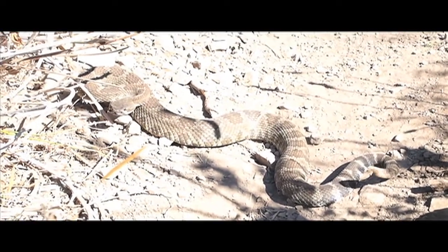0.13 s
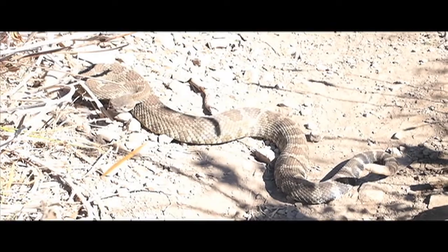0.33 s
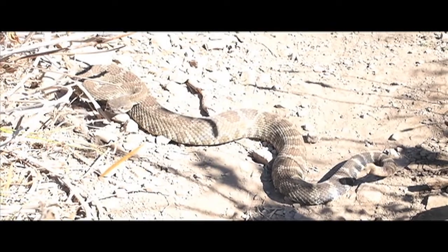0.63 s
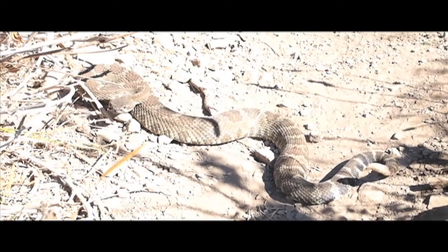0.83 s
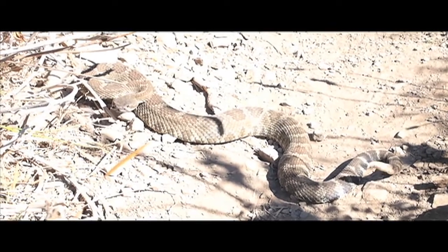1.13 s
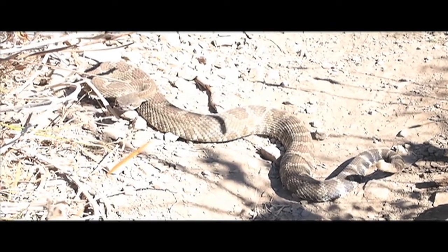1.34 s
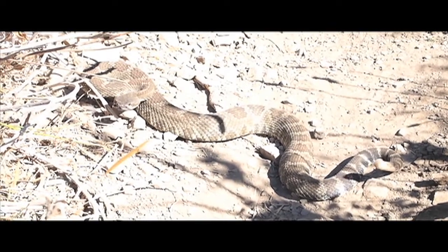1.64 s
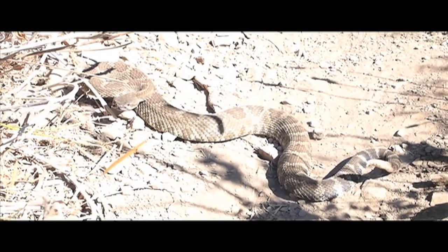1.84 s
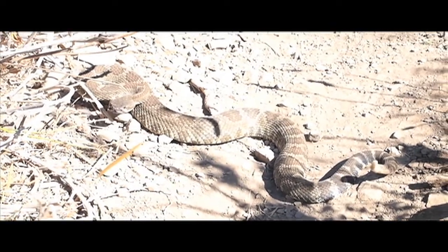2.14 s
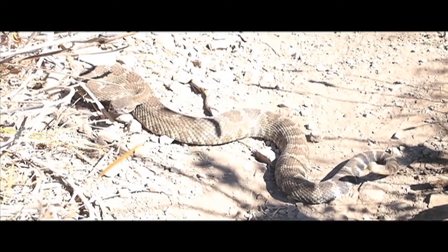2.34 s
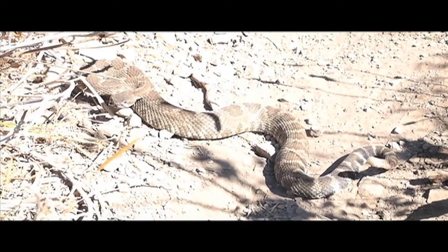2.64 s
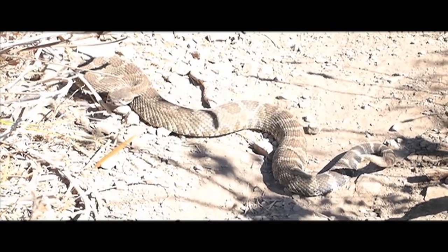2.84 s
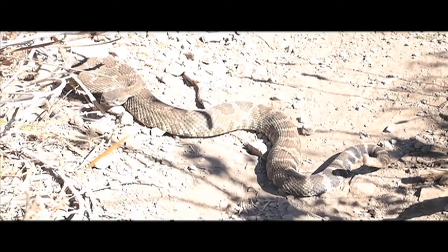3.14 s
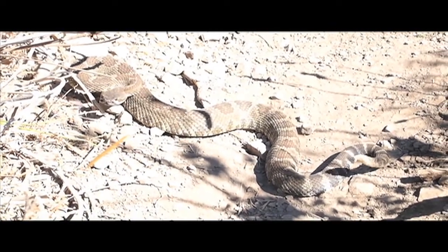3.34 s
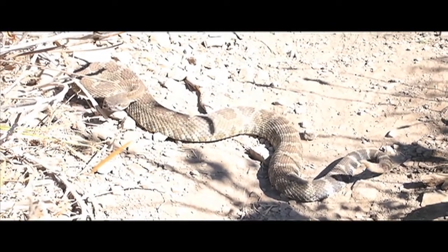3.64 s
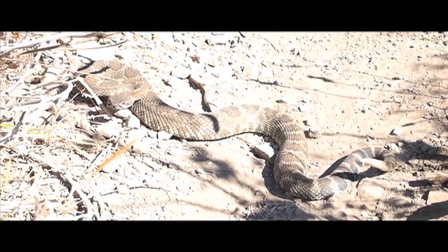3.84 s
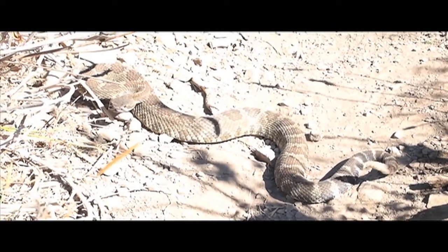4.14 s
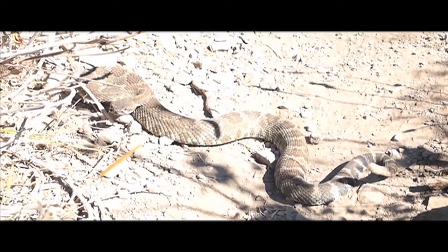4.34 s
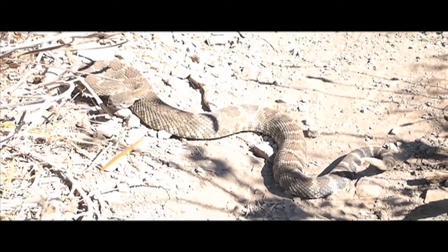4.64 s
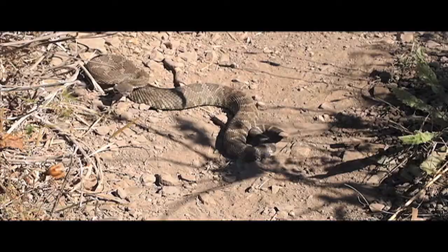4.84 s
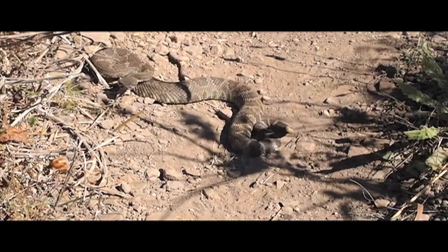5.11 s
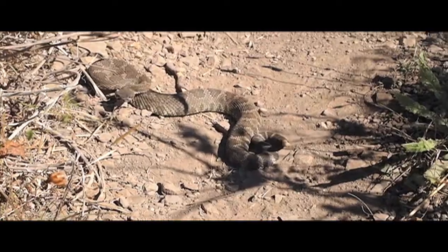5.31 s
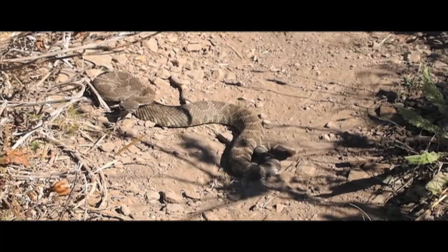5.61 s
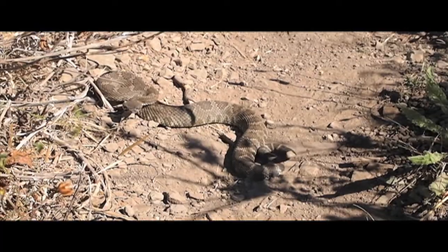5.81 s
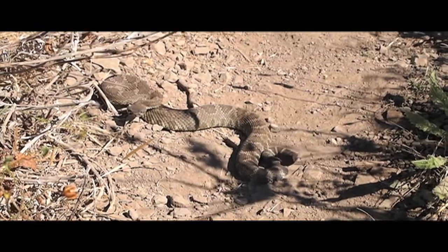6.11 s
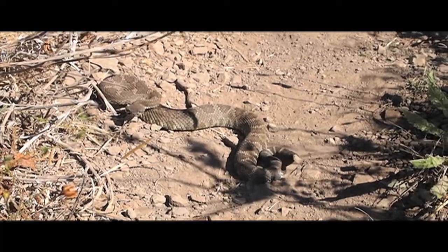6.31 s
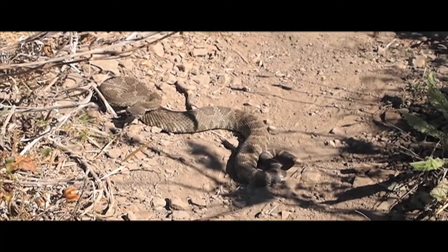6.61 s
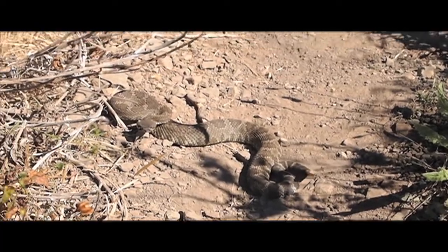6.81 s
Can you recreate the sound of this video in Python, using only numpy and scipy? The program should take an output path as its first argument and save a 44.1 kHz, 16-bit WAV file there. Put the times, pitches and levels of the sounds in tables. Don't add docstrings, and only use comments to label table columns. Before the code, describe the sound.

Close, dry outdoor perspective on stony ground with barely any echo. A bright, insect-like rattle fluttering very rapidly holds a strong level, briefly wavering around the middle. Its tone shifts slightly fuller at about five seconds, then it splits into quick separate rattle bursts with little gaps, and finally resumes as a faster continuous buzz, cut off still going. Faint wind, rustling twigs and microphone hiss stay far below.

```python
import sys
import numpy as np
from scipy import signal
from scipy.fft import rfft, irfft, next_fast_len
from scipy.io import wavfile
from scipy.ndimage import map_coordinates

SR = 44100
rng = np.random.default_rng(int(sys.argv[2]) if len(sys.argv) > 2 else 0)


def amplitude_ratio(level_db):
    exponent = np.asarray(level_db, float) / 20
    return 10 ** exponent


def unload_wav(signal):
    wavfile.write(
        sys.argv[1],
        SR,
        np.round(np.clip(np.atleast_2d(signal).T, -1, 1) * 32767).astype(np.int16),
    )


N = 306936
STEP = 16

# time_s, level_db
STEADY_SHAKING = [
    [(0, -19.5), (.15, -17.5), (1.1, -18), (2.1, -17.5), (2.95, -18.8), (3.6, -18), (4.2, -17.5),
     (4.8, -18.5), (5.38, -19)],
    [(6.36, -17), (6.55, -18), (6.96, -17.5)],
]
# time_s, full_strokes_per_s
STROKE_RATE = [(0, 43), (.5, 42.2), (.85, 43.6), (1.4, 43.4), (1.9, 41.7), (2.3, 42.7), (2.9, 42),
               (3.2, 43.8), (4.2, 43.2), (4.45, 45), (5.3, 44.8), (6.3, 46), (6.45, 54.4), (6.96, 54.6)]
# centre_s, width_ms, depth_db
FALTERS = [(.31, 19, 2.5), (.681, 12, 2.5), (1.047, 9.1, 0.5), (1.354, 26, 2.5), (1.59, 13, 2.5),
           (1.67, 10, 1.5), (1.755, 24, 2.5), (1.867, 10, 2.5), (1.938, 9, 3.5), (2.01, 11, 2.5),
           (2.083, 10, 3), (2.155, 13, 3), (2.278, 19, 5.5), (2.366, 22, 5.5), (2.465, 23, 8.5),
           (2.561, 11, 5), (2.633, 6.3, 3), (2.801, 11, 2.5), (2.87, 13, 1), (3.062, 12, 5.5),
           (3.176, 17, -2.5), (3.234, 13.3, 5), (3.343, 13, 8), (3.427, 12, 3.5), (3.501, 10, 2.5),
           (3.957, 8, 6), (4.025, 10, 1.5), (4.3, 8, 2.5), (5.043, 8, 4.5)]
# start_s, length_ms, level_db, rise_ms
FLICKS = [
    (5.451, 44, -18, 7.5),
    (5.587, 41.5, -18, 4),
    (5.756, 50.4, -19, 1.8),
    (5.945, 37.4, -17, 3),
    (6.099, 51.5, -18.5, 1.2),
    (6.25, 29.3, -16.5, 6.4),
]
# start_s, length_ms, level_db
SETTLING = [(5.388, 51, -25.5), (5.497, 42, -27.5), (5.549, 12, -42), (5.572, 15, -33), (5.635, 24, -37.5),
            (5.657, 19, -29), (5.683, 15, -48), (5.707, 8, -47), (5.749, 6.3, -23), (5.815, 28, -38),
            (5.84, 24.4, -33), (5.93, 16, -34), (5.988, 23, -33), (6.013, 11.6, -27.5), (6.028, 12, -46),
            (6.062, 9.1, -48), (6.095, 6, -35), (6.165, 59, -43), (6.192, 10, -34), (6.229, 14, -25),
            (6.289, 55, -39), (6.348, 13, -34)]
KNOCK_TURNS = [(1, 0.037, 0.19), (2, 0.47, 0.94), (4, 0.25, 0.69)]
TICK_TURNS = [(1, 0.046, 0.49), (2, 0.12, 1.87), (4, 0.36, 2.17)]
# start_s, peak_db
HARD_BLOWS = [(0.4678, -3), (0.542, -7), (0.692, -3), (.9817, -4), (1.185, -3), (1.496, -6), (2.0938, -3),
              (2.3144, -5), (2.4234, -2.5), (2.468, -2.5), (2.6928, -0.5), (2.72, -9), (3.2961, 2.5),
              (3.473, 0.5), (3.8646, -4), (4.4393, -4), (5.0625, -9), (5.227, -1), (5.4783, -4),
              (5.6063, -0.5), (5.7657, -8), (5.786, -2), (5.9589, -1), (6.107, -3), (6.148, -5),
              (6.2546, -0.5), (6.3692, -7), (6.427, -6)]
COLOUR_CHANGES = [
    4.86,
    6.33,
]
# pitch_hz, level_db (per Hz)
NEAR_COLOUR = [(1100, -42), (1850, -35.5), (2430, -20.5), (2950, -21.5), (3550, -18.5), (3850, -19.5),
               (4700, -9.5), (5500, -5.5), (7100, -15), (9000, -19), (10700, -23), (13400, -23.5),
               (14700, -22.5), (15700, -29)]
SECOND_COLOUR = [(1200, -39.5), (2100, -30), (2800, -16.5), (3500, -18.5), (3900, -13.5), (4700, -11.5),
                 (5500, -7.5), (6100, -7), (7600, -18.5), (9500, -22), (11000, -21), (12300, -27),
                 (13800, -25), (15700, -21)]
COILED_COLOUR = [(1200, -37), (1950, -33.5), (2750, -14), (3600, -17.5), (4100, -10.5), (4500, -13),
                 (5600, -6), (6100, -7.5), (7600, -16.5), (9500, -22.5), (11300, -20), (13200, -29),
                 (14500, -23), (15700, -25)]
# delay_ms, relative_amplitude
GROUND_ECHOES = [
    [(2.61, 0.086), (3.4, 0.14), (1.166, 0.069)],
    [(.365, 0.094), (1.1, 0.055), (2.85, 0.09)],
    [(.345, 0.063), (1.0, .15), (1.7, 0.014)],
]
# rumble_db, breeze_db, twigs_db
AIR_LEVELS = [
    (-56, -54.5, -57.5),
    (-52, -52.5, -55),
]
# centre_s, width_ms, lift_db
RUSTLES = [
    (.8, 110, 5.5),
    (2.9, 130, 4),
    (3.25, 80, 2),
    (4.8, 49, 11),
    (5.4, 210, 5.5),
    (6.71, 13, 9.5),
    (6.8, 15, 1),
    (6.96, 18, 5),
]
# pitch_hz, level_db (per Hz)
RUMBLE_COLOUR = [(12, -35), (22, -12), (55, -4), (105, 1), (160, -6), (260, -26)]
BREEZE_COLOUR = [(60, -29.5), (150, -1.5), (250, 0), (450, -4), (700, -15), (1100, -38.5)]
TWIG_COLOUR = [(250, -33.5), (500, -2.5), (1000, -4.5), (1400, -6), (2000, -7.5), (3500, -61)]
HISS_COLOUR = [(1200, -28), (2200, 5.5), (5500, -9), (8000, -7), (15800, 3)]
# pitch_hz, width_hz, lift_db
CAPSULE = (5535, 400, 10)
# pitch_hz, width_hz
TRAPS = [(7836, 170), (7892, 170)]


def unit(x):
    return x / np.sqrt(np.mean(x ** 2) + 1e-20)


def curve(rows):
    times, values = np.transpose(rows)
    return np.interp(np.arange(N) / SR, times, values)


def wobble(rate):
    knots = rng.standard_normal(int(N * rate / SR) + 4)
    return map_coordinates(knots, [np.arange(N) * rate / SR])


def bump(centre_s, width_ms):
    t = np.arange(0, N, STEP) / SR
    return np.exp(-.5 * ((t - centre_s) / (width_ms / 1000)) ** 2)


def edge(u):
    return .5 + .5 * np.tanh(u / 2)


def swell(start, length, rise, fall):
    t = np.arange(0, N, STEP) / SR
    return edge((t - start) / rise) * edge((start + length - t) / fall)


def fine(slow):
    return np.interp(np.arange(N), np.arange(0, N, STEP), slow)


def coloured(x, points):
    m = next_fast_len(N + 8192) // 2 * 2
    f, db = np.transpose(points)
    bins = np.fft.rfftfreq(m, 1 / SR)
    gain = amplitude_ratio(np.interp(np.log(bins + 1), np.log(f + 1), db)) + 1e-6
    cepstrum = irfft(np.log(unit(gain)), m)
    cepstrum[1:m // 2] *= 2
    cepstrum[m // 2 + 1:] = 0
    return irfft(rfft(x, m) * np.exp(rfft(cepstrum)), m)[:N]


def flick_power(start_s, length_ms, level_db, rise_ms, fall_ms):
    return (amplitude_ratio(level_db) * swell(start_s, length_ms / 1000, rise_ms / 1000, fall_ms / 1000)) ** 2


def effort():
    rebound, lag_widths = 0.21, 2.8
    falter_db = 0
    for s, ms, db in FALTERS:
        falter_db = falter_db + db * (rebound * bump(s + lag_widths * ms / 1000, ms) - bump(s, ms))
    first = amplitude_ratio(curve(STEADY_SHAKING[0])) * fine(swell(-1, 6.388, .001, 0.0027))
    second = amplitude_ratio(curve(STEADY_SHAKING[1])) * fine(swell(6.359, 2, 0.0029, .001))
    steady = (first + second) * amplitude_ratio(fine(falter_db) - 0.53 + 0.12 * wobble(14))
    flicks = sum(flick_power(*row, fall_ms=4.1) for row in FLICKS)
    loose = sum(flick_power(*row, rise_ms=0.75, fall_ms=2.4) for row in SETTLING)
    return np.sqrt(steady ** 2 + fine(flicks + loose))


def clacks(turns, slide, per_second, scatter_db, scrape_ms, scrape_share):
    phase = 2 * np.pi * np.cumsum(curve(STROKE_RATE)) / SR + slide
    crowd = sum(depth * np.cos(k * phase + at) for k, depth, at in turns)
    when, luck, sign = rng.random((30000, 3)).T
    spot = (when * N).astype(int)
    kept = np.arange(len(spot)) < per_second * N / SR
    size = kept * amplitude_ratio(-scatter_db * np.log(luck + 0.059)) * np.exp(crowd[spot])
    tap = np.bincount(spot, size * np.sign(sign - .5), N)
    fade = np.exp(-np.arange(256) / (SR * scrape_ms / 1000))
    scrape_power = np.abs(signal.fftconvolve(tap ** 2, fade)[:N])
    scrape = np.sqrt(scrape_power) * rng.standard_normal(N)
    return np.sqrt(1 - scrape_share) * unit(tap) + np.sqrt(scrape_share) * unit(scrape)


def blows(strength, slide):
    turn_at = .84
    turn_db, scatter_db, jitter_ms = -1.5, 3, 1.2
    halves = 2 * np.cumsum(curve(STROKE_RATE)) / SR + slide / np.pi - turn_at
    turns = np.flatnonzero(np.diff(np.floor(halves)) > 0)
    luck, late = rng.random((1000, 2))[:len(turns)].T
    spot = np.clip(turns + (2 * late - 1) * jitter_ms * SR / 1000, 0, N - 1).astype(int)
    size = strength[spot] * amplitude_ratio(turn_db - scatter_db * np.log(luck + 0.043))
    s, db = np.transpose(HARD_BLOWS)
    hardest = np.bincount((s * SR).astype(int), amplitude_ratio(db - 5.0) ** 2, N)
    hits = hardest + np.bincount(spot, size ** 2, N)
    lag_ms = np.arange(256) / SR * 1000
    shape = (1 - np.exp(-lag_ms / 0.31)) * np.exp(-lag_ms / 0.71)
    scrape_power = np.abs(signal.fftconvolve(hits, shape)[:N])
    scrape = np.sqrt(scrape_power) * np.sign(rng.standard_normal(N))
    return signal.lfilter(*signal.butter(1, 11000, fs=SR), scrape)


def echoed(x, echoes):
    spots = np.arange(N)
    back = sum(g * map_coordinates(x, [spots - ms * SR / 1000]) for ms, g in echoes)
    return x + signal.lfilter(*signal.butter(1, 9000, fs=SR), back)


def rattle():
    split_hz = 3870
    slide = 0.221 * wobble(3.99)
    knocks = clacks(KNOCK_TURNS, slide, per_second=2000, scatter_db=2.0, scrape_ms=0.84, scrape_share=0.71)
    ticks = clacks(TICK_TURNS, slide, per_second=2800, scatter_db=2.0, scrape_ms=1.0, scrape_share=0.68)
    dull = signal.lfilter(*signal.butter(1, split_hz, fs=SR), knocks)
    bright = signal.lfilter(*signal.butter(1, split_hz, "high", fs=SR), ticks)
    strength = effort()
    drive = strength * (dull + bright) + blows(strength, slide)
    position = np.searchsorted(COLOUR_CHANGES, np.arange(N) / SR)
    heard = np.zeros(N)
    for k, colour in enumerate((NEAR_COLOUR, SECOND_COLOUR, COILED_COLOUR)):
        heard += echoed(coloured(drive * (position == k), colour), GROUND_ECHOES[k])
    return amplitude_ratio(-5.0) * heard


def surroundings():
    scene_index = (np.arange(N) / SR > COLOUR_CHANGES[0]).astype(int)
    rumble_db, breeze_db, twigs_db = np.array(AIR_LEVELS)[scene_index].T
    rustle_db = fine(sum(db * bump(s, ms) for s, ms, db in RUSTLES))
    rumble_gain = amplitude_ratio(rumble_db + 1.9 + .5 * wobble(2.85))
    breeze_gain = amplitude_ratio(breeze_db + 0.22 * rustle_db + 1.0 * wobble(7))
    twigs_gain = amplitude_ratio(twigs_db + rustle_db + 0.98 * wobble(24))
    rumble = rumble_gain * coloured(rng.standard_normal(N), RUMBLE_COLOUR)
    breeze = breeze_gain * coloured(rng.standard_normal(N), BREEZE_COLOUR)
    twigs = twigs_gain * coloured(rng.standard_normal(N), TWIG_COLOUR)
    hiss = amplitude_ratio(-55) * coloured(rng.standard_normal(N), HISS_COLOUR)
    return rumble + breeze + twigs + hiss


def scene():
    return (rattle() + surroundings())[None]


def low_pass(x):
    return signal.sosfilt(signal.butter(12, 16550, fs=SR, output="sos"), x)


def record(dry):
    top_hz = 15745
    m = next_fast_len(N + 4096)
    f = np.fft.rfftfreq(m, 1 / SR)
    hz, width, lift_db = CAPSULE
    response = 1 + (amplitude_ratio(lift_db) - 1) * 1j * f * width / (hz * hz - f * f + 1j * f * width)
    for hz, width in TRAPS:
        response *= (hz * hz - f * f + .14j * f * width) / (hz * hz - f * f + 1j * f * width)
    response *= amplitude_ratio(-.5 * np.maximum(f - top_hz, 0))
    mix = irfft(rfft(dry, m) * response, m)[..., :N]
    return low_pass(mix)


dry = scene()
out = record(dry)
unload_wav(out)
```